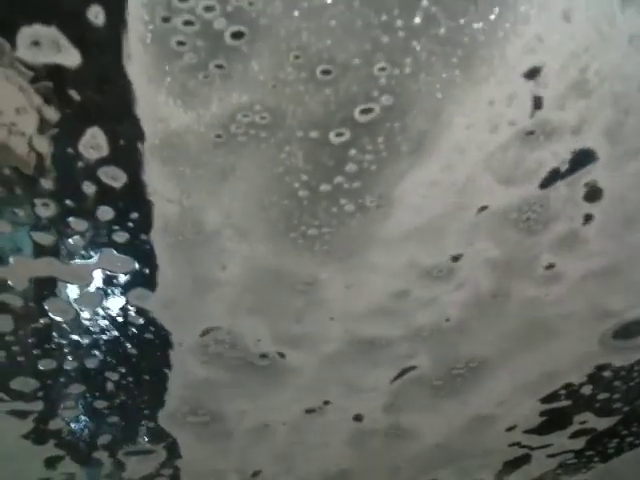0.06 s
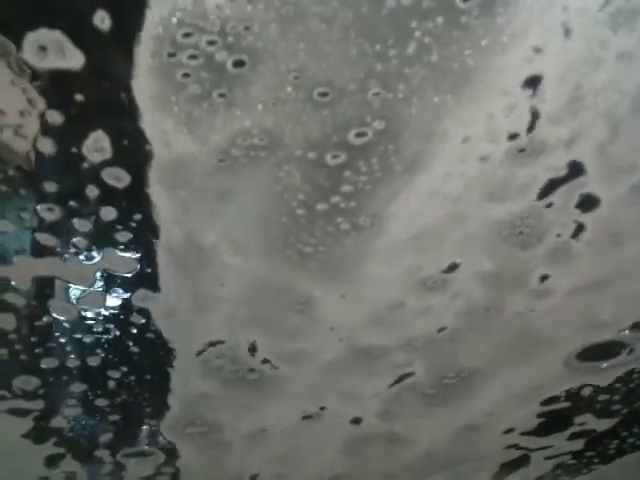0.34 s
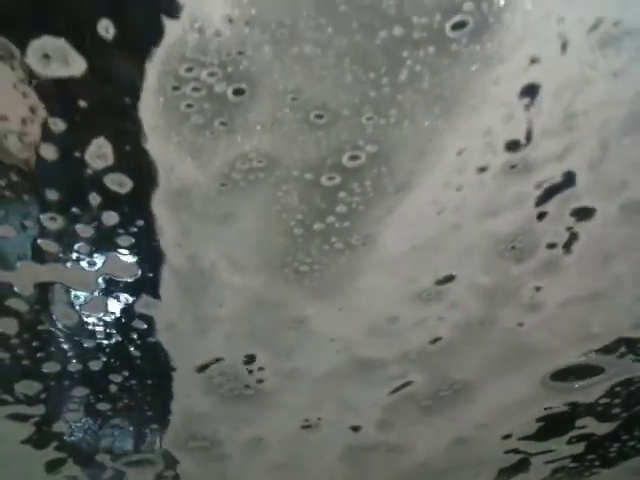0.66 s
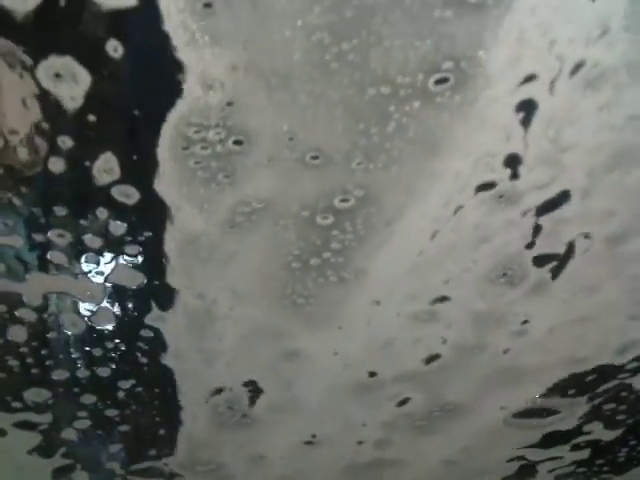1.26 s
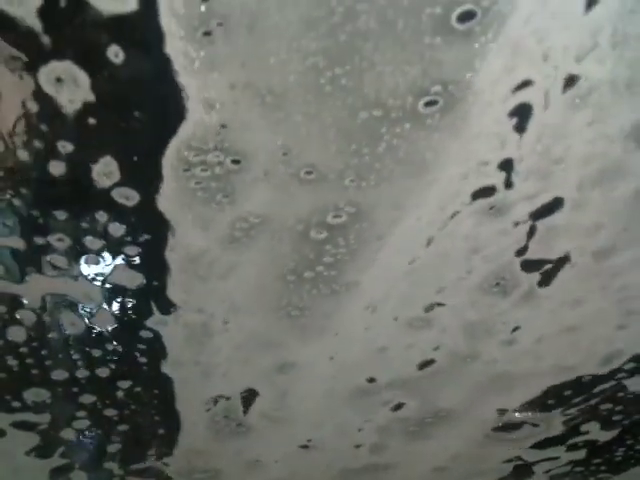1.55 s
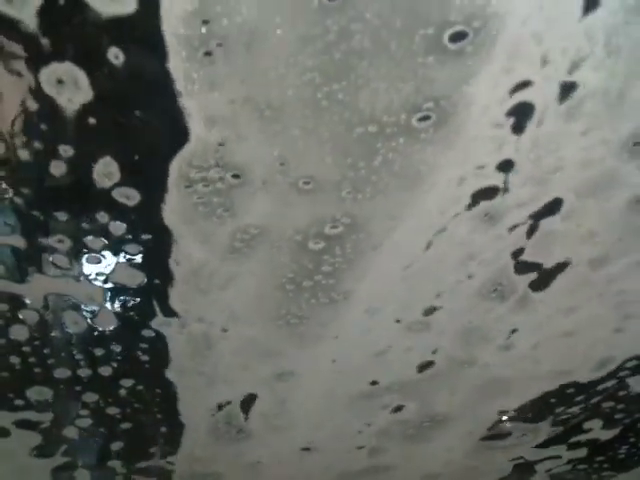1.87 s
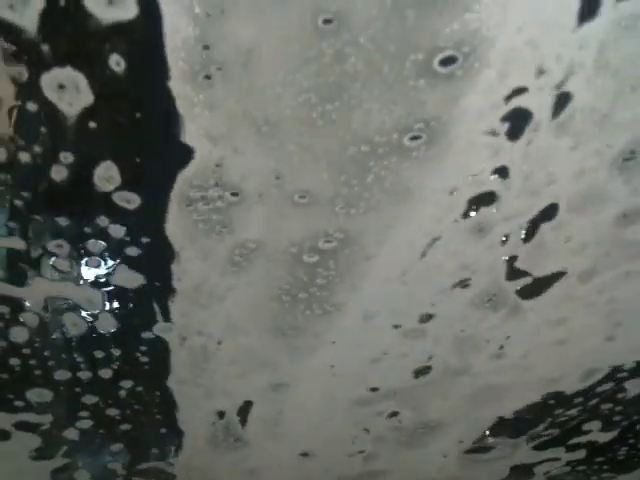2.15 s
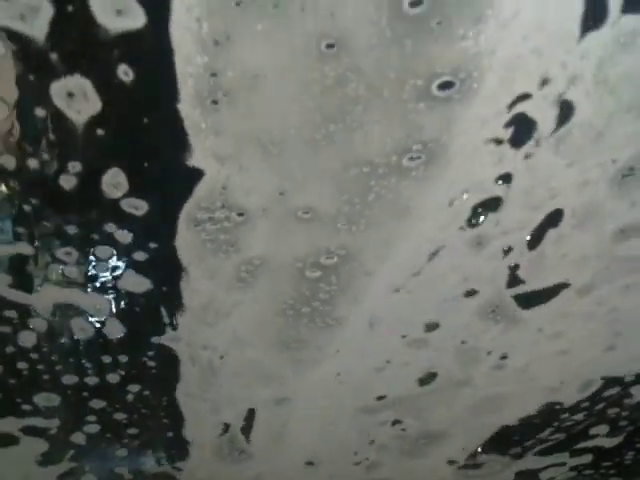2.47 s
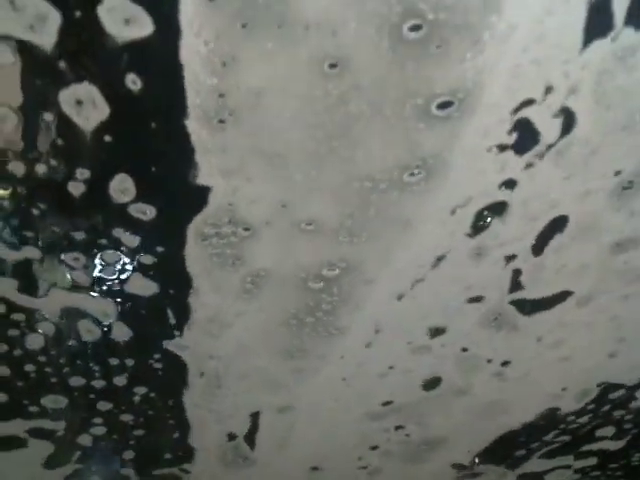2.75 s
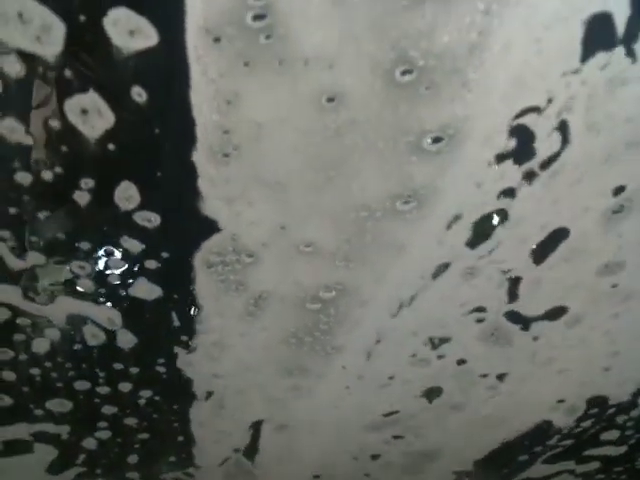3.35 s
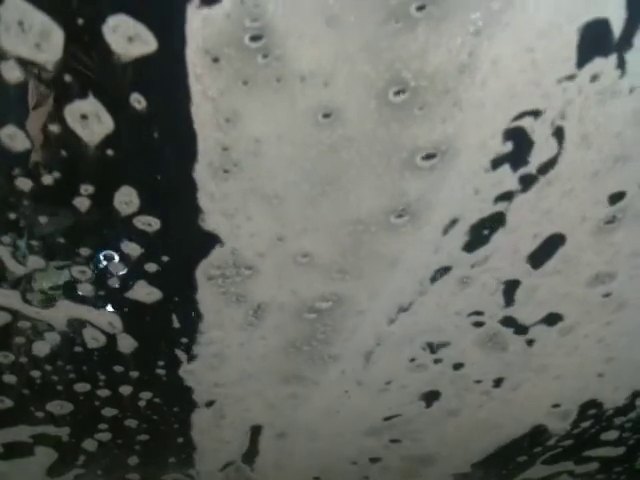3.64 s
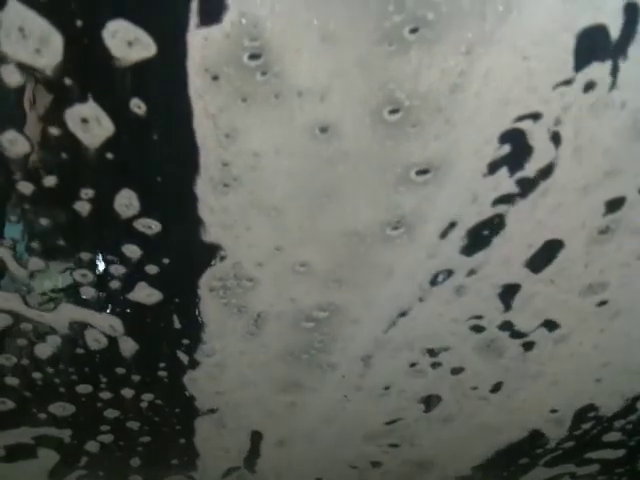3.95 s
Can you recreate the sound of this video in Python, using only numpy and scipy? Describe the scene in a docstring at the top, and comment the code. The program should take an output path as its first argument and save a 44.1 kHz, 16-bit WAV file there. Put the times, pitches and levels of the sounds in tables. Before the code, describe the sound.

Soft splats of water hit soapy glass, heard from behind it, as car wash pumps rumble.

```python
"""Water splashing on a foam-covered pane in a car wash, heard from behind the pane.
Each soft, short splat is a crowd of tiny bursting bubbles, some with a dull knock; larger bubbles
ring, foam snaps and hard drops ring the pane, over fine patter and the hiss of spray.
Behind it pumps and brushes rumble with short low booms, water churns, motors hum on multiples
of the shaft rate and electronics whine faintly."""
import sys
import numpy as np
from scipy import signal
from scipy.fft import rfft, irfft
from scipy.io import wavfile
from scipy.ndimage import uniform_filter1d

SR = 44100
rng = np.random.default_rng(int(sys.argv[2]) if len(sys.argv) > 2 else 0)


def generate_wav(signal):
    """Clip the signal to [-1, 1] and save it as 16-bit WAV at the path in sys.argv[1]."""
    frames = np.transpose(np.atleast_2d(signal))
    scaled = np.clip(frames, -1, 1) * 32767
    pcm = np.round(scaled).astype(np.int16)
    wavfile.write(sys.argv[1], SR, pcm)


N = 176400
HALF_WINDOW_S = .04  # each side of a cluster's or boom's centre


def undb(db):
    """Decibels to gain."""
    return 10 ** (np.asarray(db) / 20)


def level(x, db):
    """Scale to an rms level."""
    return x * undb(db) / np.sqrt(np.mean(x ** 2) + 1e-20)


def envelope(points):
    """Gain curve through (s, dB) points."""
    return undb(np.interp(np.arange(N) / SR, *np.array(points).T))


def walk(rate_hz):
    """Smooth random curve, unit spread, about rate_hz changes a second."""
    hold = int(SR / rate_hz)
    steps = np.repeat(rng.standard_normal(N // hold + 1), hold)
    smooth = uniform_filter1d(uniform_filter1d(steps, hold), hold)[:N]
    return smooth / smooth.std()


def noise(points, flicker_db, flicker_hz):
    """Noise with a spectrum through (Hz, dB) points; each octave flickers on its own."""
    octave = np.log2(np.maximum(np.arange(N // 2 + 1) * SR / N, 1))
    hz, db = np.array(points, float).T
    shape = undb(np.interp(octave, np.log2(hz), db, left=-200, right=-200))
    spectrum = rfft(rng.standard_normal(N)) * shape
    centres = np.arange(np.floor(np.log2(hz[0])), np.log2(hz[-1]) + 1)
    bands = (irfft(spectrum * np.maximum(1 - abs(octave - c), 0), N) for c in centres)
    return sum(band * undb(flicker_db * walk(flicker_hz)) for band in bands)


def add(out, x, start_s):
    """Mix x into out from start_s on."""
    i = int(start_s * SR)
    a, b = max(i, 0), min(i + len(x), N)
    if b > a:
        out[a:b] += x[a - i:b - i]


def bursts(spread_s, count, scatter_db=3.3):
    """Times and sizes of a crowd of tiny bursts that swells fast and dies away, centred on zero."""
    age = 5 * (np.arange(count) + rng.random(count)) / count
    size = age * np.exp(-age) * undb(scatter_db * rng.standard_normal(count))
    age = age - np.average(age, weights=size ** 2)
    return spread_s * age / np.sqrt(np.average(age ** 2, weights=size ** 2)), size


def cluster(grains, low_hz, high_hz, decay_cycles, per_burst):
    """Each burst starts damped rings within a band; unit energy, time zero at mid-window."""
    start_s, size = (np.repeat(v, per_burst)[:, None] for v in grains)
    hz = low_hz * (high_hz / low_hz) ** rng.random(start_s.shape)
    age = np.arange(int(5 * decay_cycles / low_hz * SR))
    turns = age / SR * hz
    shape = np.exp(-turns / decay_cycles) * (1 - np.exp(-2 * turns))
    rings = size * rng.choice([-1, 1], start_s.shape) * shape * np.sin(2 * np.pi * turns)
    index = np.maximum((start_s + HALF_WINDOW_S) * SR, 0).astype(int) + age
    width = int(2 * HALF_WINDOW_S * SR)
    x = np.bincount(index.ravel(), rings.ravel(), width)[:width]
    return x / np.sqrt(np.sum(x ** 2) / SR + 1e-20)


def whine(tone_hz=15000, flips_per_s=60):
    """Thin electronic tone; steady polarity flips split it into close lines."""
    t = np.arange(N) / SR
    polarity = uniform_filter1d(np.sign(np.sin(np.pi * flips_per_s * t)), size=64)
    return level(polarity * np.sin(2 * np.pi * tone_hz * t), db=-76)


def spray():
    """Spray hisses with a slight flicker."""
    # Each row: frequency in Hz, relative density in dB.
    spectrum = [(1120, -23), (1900, 4), (3540, 0.5), (7680, -11.5), (9400, -17.5), (13100, -20.5),
                (14200, -27), (15500, -25)]
    return level(noise(spectrum, flicker_db=1, flicker_hz=20), db=-58.5)


def rumble(bass_hz=219, swell_db=-.21):
    """Pumps and brushes rumble; the bass swells and sags."""
    # Each row: frequency in Hz, relative density in dB.
    spectrum = [(15, -64), (25, -32), (59, -39), (75, -25.5), (128, -3), (178, 2.5), (234, -1.5), (350, -1),
                (461, -2.5), (564, -14.5), (730, -13.5), (961, -21), (1360, -23), (1580, -29.5),
                (1760, -29), (2000, -38), (2600, -53), (4400, -120)]
    # Each row: time in seconds, bass gain in dB.
    bass_gain = [(0, 0), (.7, -1), (1.1, 1), (1.3, -0.5), (1.5, -1), (1.9, 0.5), (2.2, 1), (2.5, -1),
                 (2.9, -1.5), (3.4, -0.5), (4, -0.5)]
    broad = level(noise(spectrum, flicker_db=-.8, flicker_hz=9.27), db=-33)
    broad *= undb(swell_db * walk(rate_hz=1.96))
    bass = signal.sosfiltfilt(signal.butter(4, bass_hz, fs=SR, output="sos"), broad)
    return broad + bass * (envelope(bass_gain) - 1)


def drone(centre_hz=340, edge_ratio=1.14):
    """Narrow-band machinery drone that swells early, then fades."""
    # Each row: time in seconds, level in dB.
    levels = [(0, -42), (.25, -36), (.6, -39.5), (1, -45.5), (1.5, -54), (4, -51)]
    band = [(centre_hz / edge_ratio, -10), (centre_hz, 0), (centre_hz * edge_ratio, -10)]
    return level(noise(band, flicker_db=0, flicker_hz=2), db=0) * envelope(levels)


def motor_hum(shaft_hz=59.2, wander=.002034, waver_db=1.5):
    """Motors hum in wavering lines on multiples of the shaft rate."""
    # Each entry: multiple of the shaft rate.
    orders = [1, 2, 3, 5, 6, 8, 9]
    # Each entry: rms level of that line in dB.
    levels_db = [-70.5, -64, -47, -52, -50.5, -53.5, -53]
    shaft_rad = 2 * np.pi * np.cumsum(shaft_hz * (1 + wander * walk(rate_hz=3))) / SR
    out = np.zeros(N)
    for order, db in zip(orders, levels_db):
        line = np.sin(order * shaft_rad + 2 * np.pi * rng.random())
        out += level(line * undb(waver_db * walk(rate_hz=3.69)), db)
    return out


def churn():
    """Water tumbles in the machinery in uneven, gurgling surges."""
    # Each row: frequency in Hz, relative density in dB.
    spectrum = [(470, -14), (560, 2.5), (740, -1), (1000, -8.5), (1400, -17.5)]
    # Each row: time in seconds, level in dB.
    surges = [(0, -52), (.45, -49), (.56, -46.5), (.66, -51), (.72, -40), (.78, -54.5), (.86, -47.5),
              (1, -46.5), (1.1, -52.5), (1.31, -46), (1.42, -50), (1.7, -46.5), (1.93, -54), (2.01, -43),
              (2.1, -52.5), (2.7, -46.5), (3.3, -51.5), (4, -48)]
    return level(noise(spectrum, flicker_db=2.5, flicker_hz=29.9), db=0) * envelope(surges)


def booms(length_s=.0186, boom_cycles=1.53, knock_hz=658, knock_cycles=2.73):
    """Short low booms: brief swells of the rumble, with dull knocks strongest where splats land."""
    # Each row: centre in seconds, boom pitch in Hz, boom level in dB, knock level in dB.
    swells = [(0.467, 327, -25, -60), (0.828, 400, -24, -43), (0.972, 335, -28, -43),
              (1.102, 152, -26, -57), (1.508, 180, -26, -54), (2.543, 173, -27, -41.5),
              (2.654, 141, -27, -37), (2.728, 169, -22.5, -36), (2.929, 197, -30.5, -40),
              (3.278, 199, -27, -40), (3.369, 209, -25, -38.5), (3.563, 197, -25.5, -45)]
    out, t = np.zeros(N), np.arange(-HALF_WINDOW_S, HALF_WINDOW_S, 1 / SR)
    lead_s = .5 * knock_cycles / knock_hz
    for at_s, hz, boom_db, knock_db in swells:
        boom = np.exp(-(hz * t / boom_cycles) ** 2) * np.cos(2 * np.pi * hz * t)
        grains = bursts(length_s / 4, count=8)
        knock = cluster(grains, knock_hz / 1.25, knock_hz * 1.29, knock_cycles, per_burst=2)
        add(out, undb(boom_db) * boom, at_s - HALF_WINDOW_S)
        add(out, undb(knock_db) * np.sqrt(length_s) * knock, at_s - HALF_WINDOW_S - lead_s)
    return out


def cabin(x, t60_s=.06, tail_db=-10):
    """The small, damped space behind the pane adds a brief tail."""
    t = np.arange(SR // 10) / SR
    tail = rng.standard_normal(len(t)) * np.exp(-np.log(1000) * t / t60_s) * (t > .002)
    return x + undb(tail_db) * signal.fftconvolve(x, tail / np.sqrt(np.sum(tail ** 2)))[:N]


def patter(candidates=400, scatter_db=2):
    """Droplets land at random, thicker when the spray sweeps over the pane."""
    # Each row: time in seconds, drops per second (capped by the supply of candidates).
    rates = [(0, 35), (.9, 77), (1.4, 30), (2.2, 35), (2.6, 110), (3.4, 27), (4, 53)]
    out = np.zeros(N)
    draws, sizes = rng.random((candidates, 2)), rng.standard_normal(candidates)
    for (place, chance), size in zip(draws, sizes):
        at_s = place * N / SR
        grains = bursts(spread_s=.004, count=5)
        drop = cluster(grains, low_hz=1486, high_hz=5650, decay_cycles=1.5, per_burst=2)
        if chance * candidates < np.interp(at_s, *np.array(rates).T) * N / SR:
            add(out, drop * undb(scatter_db * min(size, 1.5)), at_s - HALF_WINDOW_S)
    return level(out, db=-66.5)


def taps():
    """A hard drop pushes on the wet pane while it flattens; the damped modes ring on."""
    # Each row: time in seconds, strength in dB, contact in seconds.
    drops = [(3.2746, -36, .004), (3.368, -41.5, 0.0051)]
    # Each row: mode frequency in Hz, relative level in dB, T60 in seconds.
    modes = [(1020, 1.5, 0.034), (1424, 1, 0.029), (1730, 0, 0.026), (2850, -2.5, 0.015),
             (3670, -5.5, 0.023), (4590, -12, 0.012), (5570, -10, 0.012)]
    out, t = np.zeros(N), np.arange(SR // 10) / SR
    for at_s, strength_db, contact_s in drops:
        push = np.sin(np.pi / 2 * np.minimum(t / contact_s, 1))
        free_s = np.maximum(t - contact_s, 0)
        ring = np.zeros(len(t))
        for hz, db, t60_s in modes:
            decay = np.exp(-np.log(1000) * free_s / t60_s)
            ring += undb(db) * decay * np.sin(2 * np.pi * (hz * t + rng.random()))
        add(out, undb(strength_db) * push * ring, at_s - contact_s / 2)
    return out


def bubbles(rise_cycles=2.5, decay_cycles=11, glide_per_s=5):
    """Larger bubbles ring in the wet film, rising in pitch as they open."""
    # Each row: start in seconds, starting pitch in Hz, gain in dB.
    pops = [(0.211, 3200, -49), (0.515, 2690, -47), (0.59, 3320, -43), (0.823, 3020, -42.5),
            (0.921, 3950, -42), (0.953, 1890, -42), (0.959, 2800, -43), (1.781, 3550, -41),
            (1.897, 3100, -43), (2.037, 2840, -36.5), (2.037, 3800, -35), (2.65, 2580, -39),
            (2.657, 3870, -38), (2.729, 3870, -43), (3.129, 3500, -36)]
    out, t = np.zeros(N), np.arange(SR // 25) / SR
    for start_s, hz, db in pops:
        turns = hz * t * (1 + glide_per_s * t / 2)
        shape = (1 - np.exp(-turns / rise_cycles)) * np.exp(-turns / decay_cycles)
        add(out, undb(db) * shape * np.sin(2 * np.pi * turns), start_s)
    return out


def snaps(length_s=.004):
    """Taut foam tears within milliseconds with a bright snap."""
    # Each row: centre in seconds, level in dB.
    tears = [(1.781, -59), (2.038, -54), (2.367, -50), (2.592, -57), (2.614, -52), (2.648, -54.5),
             (2.921, -59), (2.989, -55), (3.706, -61)]
    out = np.zeros(N)
    for at_s, db in tears:
        grains = bursts(length_s / 4, count=12)
        crack = cluster(grains, low_hz=4500, high_hz=14000, decay_cycles=4, per_burst=3)
        add(out, undb(db) * np.sqrt(length_s) * crack, at_s - HALF_WINDOW_S)
    return out


def splats(snap_over_fizz_db=-22):
    """Each splat is a crowd of tiny bubbles bursting within milliseconds, in all registers at once."""
    # Each row: centre in seconds, length in seconds, then body, splash and fizz in dB before trim.
    hits = [(0.182, 0.013, -46, -55, -73), (0.214, 0.0063, -50, -53, -72), (0.383, 0.009, -56, -55, -64),
            (0.401, 0.014, -46, -49, -60), (0.517, 0.018, -61, -50.5, -65), (0.592, 0.019, -45, -51, -64),
            (0.671, 0.015, -56, -53, -59), (0.791, 0.014, -52, -61, -61), (0.826, 0.0091, -52, -47, -58.5),
            (0.91, 0.016, -49, -50.5, -62), (0.923, 0.0092, -50, -51, -58), (0.946, 0.014, -44, -52, -66),
            (0.96, 0.014, -45, -51, -67), (0.994, 0.0077, -54, -53, -59.5), (1.217, 0.0075, -46, -49, -60),
            (1.239, 0.016, -53, -49.5, -58.5), (1.476, 0.011, -55, -51.5, -62),
            (1.572, 0.0072, -44, -53, -60.5), (1.71, 0.019, -49, -48.5, -60),
            (1.769, 0.0052, -48, -46, -54), (1.78, 0.0079, -55, -42, -52), (1.881, 0.017, -57, -53, -62),
            (1.895, 0.015, -55, -52, -62), (1.99, 0.015, -48, -52.5, -63), (2.005, 0.011, -53, -50, -68),
            (2.037, 0.007, -57, -42.5, -55.5), (2.119, 0.0071, -60, -49, -66),
            (2.339, 0.0095, -57, -54, -58), (2.368, 0.0082, -49, -47, -54.5),
            (2.385, 0.016, -62, -50.5, -68), (2.413, 0.006, -52, -51, -60), (2.424, 0.007, -41.5, -45, -51),
            (2.503, 0.0065, -39, -47, -66), (2.526, 0.012, -46, -46, -53), (2.538, 0.013, -41.5, -50, -58),
            (2.595, 0.013, -52, -43, -54), (2.613, 0.0061, -39, -50, -52.5), (2.64, 0.0055, -56, -49, -73),
            (2.651, 0.013, -47, -41, -47.5), (2.709, 0.017, -40.5, -42.5, -52.5),
            (2.73, 0.014, -58, -52, -67), (2.799, 0.016, -51, -48.5, -58), (2.921, 0.011, -50, -40.5, -52),
            (2.928, 0.0076, -53, -47, -57), (2.947, 0.017, -58, -47, -57),
            (2.991, 0.0094, -42, -40.5, -48.5), (3.079, 0.014, -40, -50.5, -63),
            (3.13, 0.0091, -43, -43.5, -53), (3.15, 0.01, -56, -49, -58), (3.207, 0.019, -43, -52.5, -64),
            (3.274, 0.0056, -43, -37, -55.5), (3.366, 0.015, -36.5, -44, -54.5),
            (3.546, 0.0074, -38, -47, -57), (3.572, 0.021, -45, -52, -64), (3.652, 0.012, -44, -51.5, -63),
            (3.707, 0.007, -36.5, -46, -57), (3.729, 0.011, -47, -49.5, -71), (3.867, 0.011, -40, -53, -61),
            (3.876, 0.0087, -45, -46.5, -57.5), (3.979, 0.025, -45, -52.5, -61)]
    # Rows are body, splash, fizz. Each row: low and high edge in Hz, decay in cycles, trim in dB.
    registers = [(826, 2025, 3.6, -6), (2300, 4960, 2.35, -3), (5200, 8000, 1.37, 0)]
    out = np.zeros(N)
    for at_s, length_s, *levels_db in hits:
        grains = bursts(spread_s=.29 * length_s, count=70)
        splat = sum(undb(db + trim_db) * cluster(grains, low_hz, high_hz, cycles, per_burst=2)
                    for db, (low_hz, high_hz, cycles, trim_db) in zip(levels_db, registers))
        snap = cluster(grains, low_hz=9000, high_hz=12500, decay_cycles=4, per_burst=1)
        splat += undb(levels_db[2] + snap_over_fizz_db) * snap
        add(out, np.sqrt(length_s) * splat, at_s - HALF_WINDOW_S)
    return out


def scene():
    """Mono mix; only the brighter water sounds on the pane get the cabin tail."""
    direct = spray() + rumble() + drone() + motor_hum() + whine() + booms() + churn()
    pane = splats() + snaps() + bubbles() + taps() + patter()
    return (direct + cabin(pane))[None]


def record(dry, top_hz=15700):
    """A steep low-pass cuts the top."""
    return signal.sosfilt(signal.ellip(10, .1, 80, top_hz, fs=SR, output="sos"), dry)


dry = scene()
out = record(dry)
generate_wav(out)
```